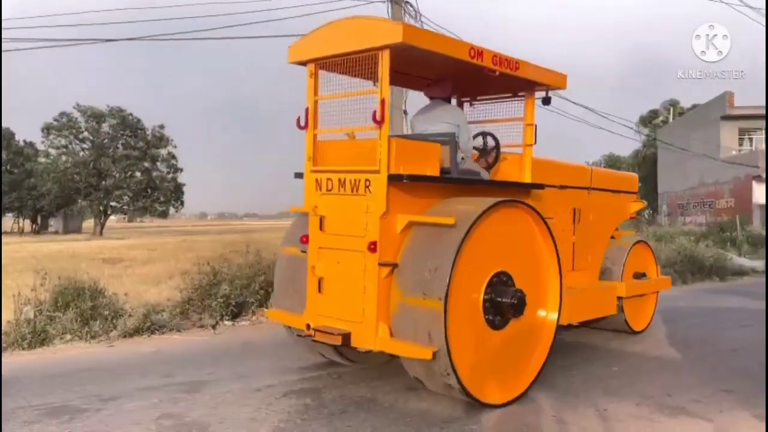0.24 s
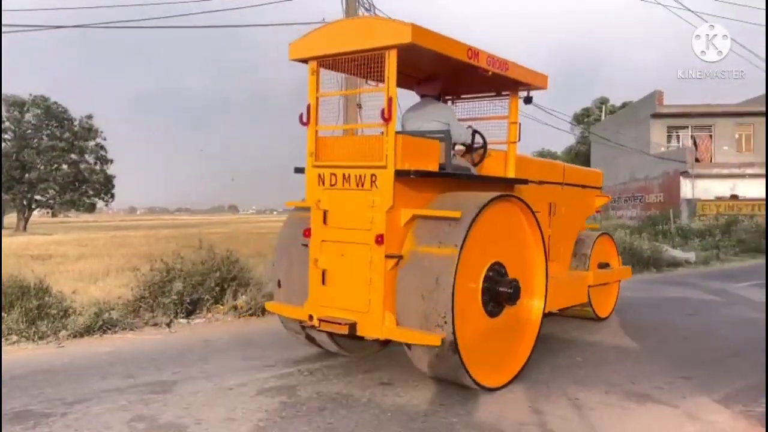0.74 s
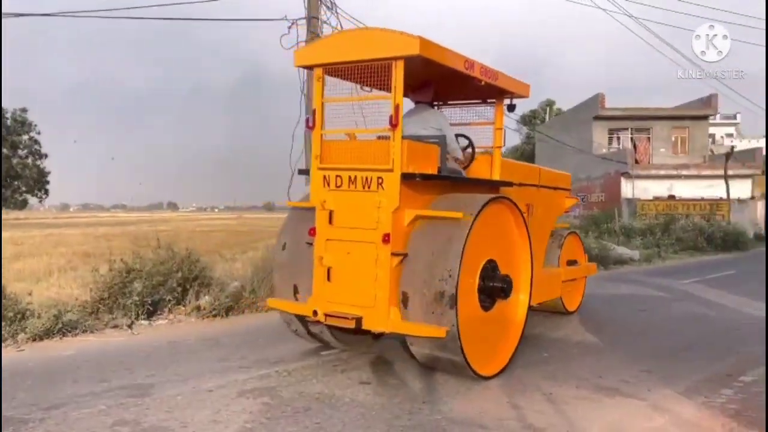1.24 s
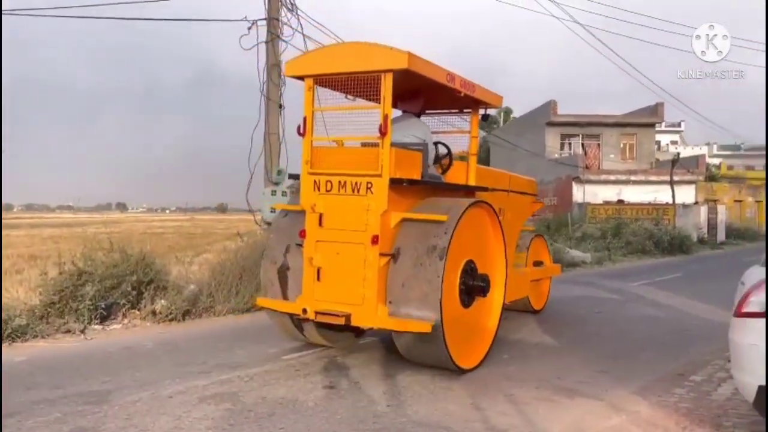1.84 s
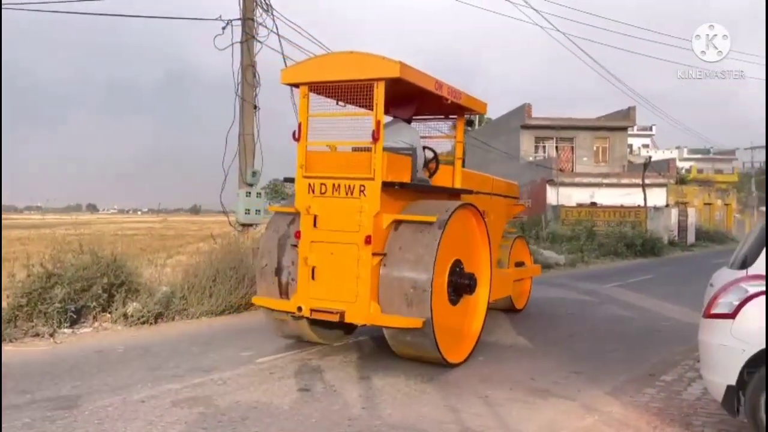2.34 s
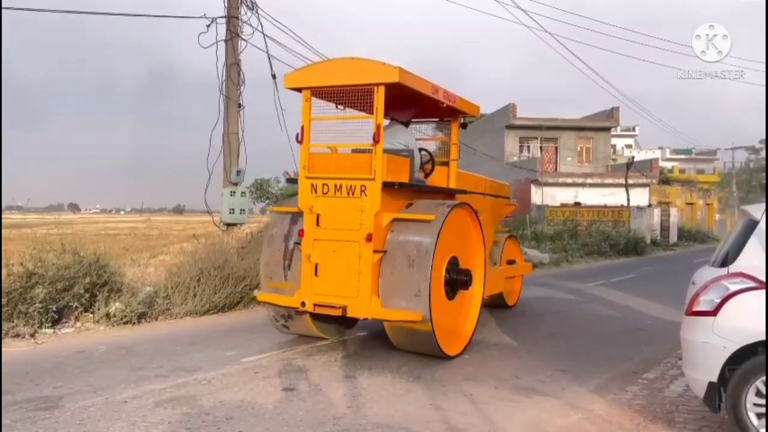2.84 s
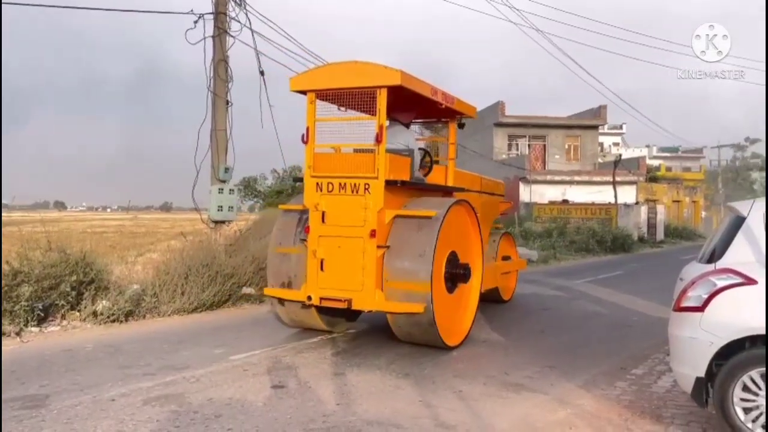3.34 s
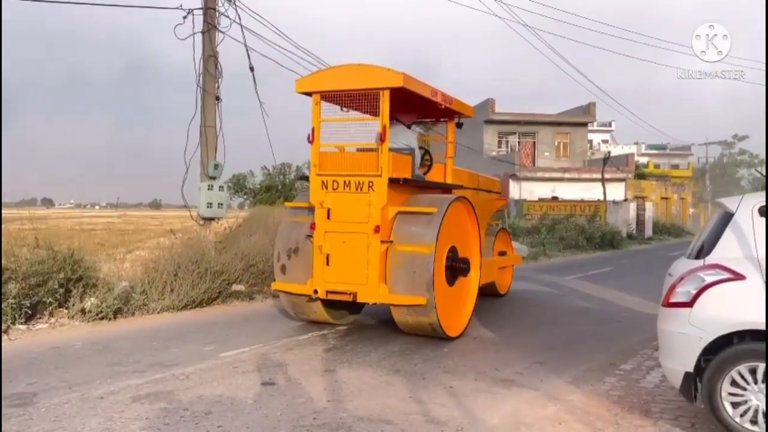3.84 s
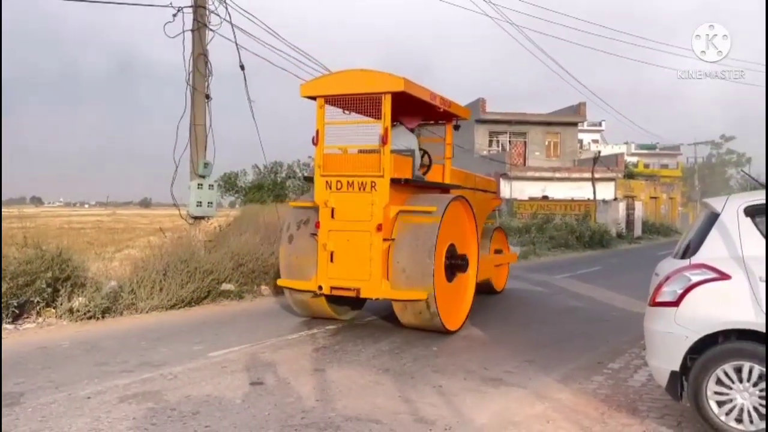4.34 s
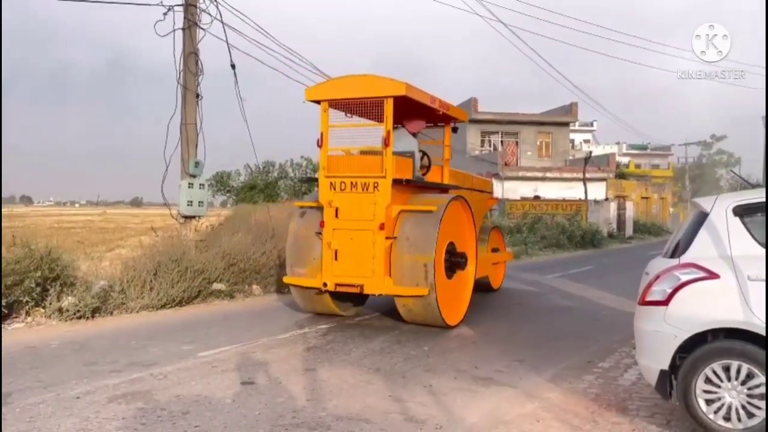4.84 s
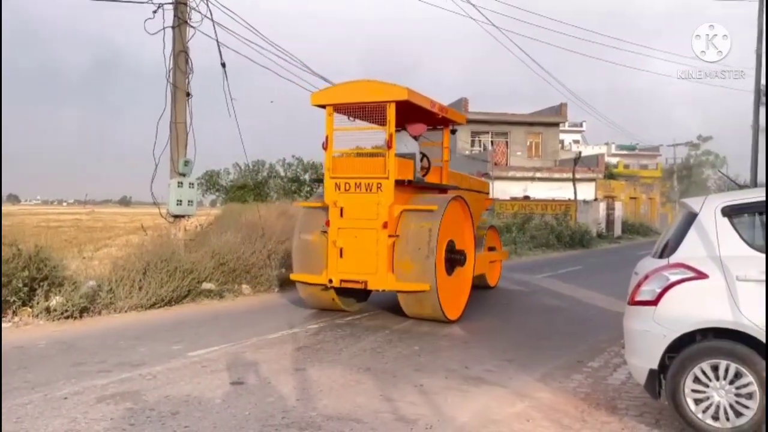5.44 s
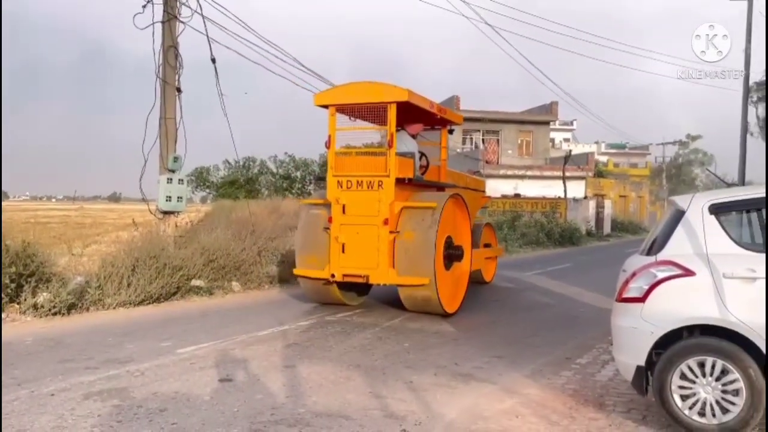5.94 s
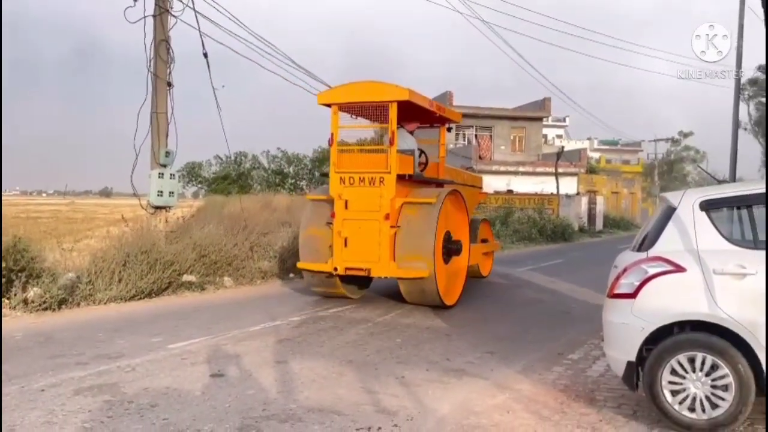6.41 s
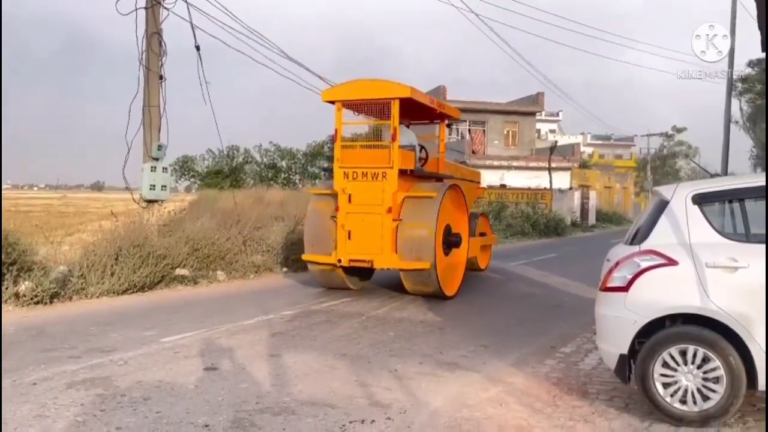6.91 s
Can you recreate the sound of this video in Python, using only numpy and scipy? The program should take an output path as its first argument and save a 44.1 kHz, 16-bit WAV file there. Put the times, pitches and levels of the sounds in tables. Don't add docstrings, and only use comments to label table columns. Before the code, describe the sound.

From 0 s a heavy six-cylinder diesel road roller is already running nearby at a constant idle, about fifty uneven firings a second grouped in a throb roughly eight times a second. Hard casing knocks ring around 1 kHz, over a low exhaust hum, a broad roar of fan, gears and drums, and a thin flickering valve hiss. It fades gently by about 5 dB through 7 s, sounding somewhat duller as it turns its back. Wind rumbles on the open stereo microphone throughout. A low thud hits at 0.4 s, softer ones near 1.2 and 2.3; puffs burst around 2.5, and a strong cluster of thumps comes at 3.4 to 4.0, with more puffs at 4.4. Wind is calmer around 5 s, then dense crackling flutters run 5.8 to 6.4. After 6.6 the breeze drops, leaving the receding engine. Open air, slightly thin camera treble.

```python
import sys
import numpy as np
from scipy import signal
from scipy.fft import rfft, irfft, next_fast_len
from scipy.io import wavfile
from scipy.ndimage import uniform_filter1d

SR = 44100
rng = np.random.default_rng(int(sys.argv[2]) if len(sys.argv) > 2 else 0)


def elevation(decibels):
    levels = np.asarray(decibels, float)
    return 10 ** (levels / 20)


def bounce(signal):
    frames = np.transpose(np.atleast_2d(signal))
    limited = np.clip(frames, -1, 1)
    pcm = np.round(limited * 32767).astype(np.int16)
    wavfile.write(sys.argv[1], SR, pcm)


N = 316197

# time_s, level_db
DISTANCE = [(0, -35), (.35, -34.5), (.7, -36), (1.5, -36.5), (2.5, -37.5), (3.5, -37), (4.5, -38),
            (5.5, -38.5), (6.4, -39.5), (7.17, -40)]
# time_s, tilt_db
TURNING = [(0, -7), (1.5, 2), (3, 1), (5, 8), (7.17, -1)]
# pitch_hz, width_hz, level_db, blow_db from each of six cylinders in turn
CASING_MODES = [
    (1010, 34, 0.5, (0, -4, -13, -4, -12, -10)),
    (960, 30, -1.5, (-1, 0, -12, -8, -12, -8)),
    (1044, 24, -1.5, (-1, -5, -9, -2, -10, -4)),
    (830, 50, -4, (-11, -8, 0, -13, -9, -6)),
    (1502, 28, -8.5, (-5, -5, -2, 0, -5, -4)),
    (2600, 180, -9.5, (0, -4, -3, -1, -4, -3)),
    (3400, 160, -17, (-3, 0, -4, -3, -1, -4)),
]
# multiple of the firing rate, level_db
EXHAUST_HARMONICS = [(1, 2.5), (3, 4.5), (5, 0.5), (7, -3), (8, -5)]
# pitch_hz, level_db per hertz
ROAR_COLOUR = [(30, -23), (60, -23), (150, -3.5), (500, -10), (1040, -4), (1100, -10), (1600, -9.5),
               (1800, -15.5), (2600, -16.5), (4400, -19.5), (4800, -22), (6500, -22.5), (7000, -25),
               (7600, -44)]
# pitch_hz, level_db
HISS_COLOUR = [(6600, -43), (7200, 7.5), (8100, -3), (8800, -1), (9200, 2.5), (10500, -2), (11600, -4),
               (11900, -30)]
# pitch_hz, likeness from -1 to 1 (below zero they swing against each other)
PORT_LIKENESS = [(550, .7), (1000, .9), (1900, .15), (2600, .6), (3200, .75), (3700, .9), (4300, .9),
                 (5100, .5), (6000, .88), (6650, 0.3), (7600, -.97), (8950, -.96), (9900, 0.2),
                 (10500, .975)]
# pitch_hz, lead_rad
PORT_LEAD = [(60, -0.5), (1500, 0.57), (2000, 0.3), (2800, 1.26), (3300, 0.5), (4500, 1.06), (5300, 0.95),
             (5800, 1), (12000, 0.5)]
# pitch_hz, lean_db
PORT_LEAN = [(60, -4), (500, 1.5), (1000, 1.5), (2200, 3.5), (3300, 3), (4200, 1.4), (5200, 7), (6000, 2),
             (7000, 5.5), (7600, -2.5)]
# time_s, strength_db, fineness_db (small eddies gain what large ones lose)
BREEZE = [(0, -23, 2.5), (1, -24.5, -1.5), (1.4, -22, 1.5), (2, -23, 3), (2.8, -24.5, -1.5), (3, -20, -0.5),
          (3.5, -23, -0.5), (4.1, -23, -0.5), (4.4, -26.5, 7), (4.6, -27.5, 4.5), (4.9, -28.5, 4),
          (5.4, -26.5, 6), (5.75, -23.5, 2), (5.9, -23, 6), (6.15, -25, 7.5), (6.45, -28, 0.5),
          (6.6, -41, -10.5), (7.17, -39, -5.5)]
# middle_s, length_s, top_db
SWELLS = [(0.0, 0.32, -13.5), (0.246, 0.32, -14.5), (0.386, .11, -15), (0.542, .16, -16),
          (0.692, 0.23, -15.5), (0.936, 0.27, -15.5), (1.187, 0.18, -11.5), (1.504, 0.63, -20),
          (1.67, 0.24, -17), (1.8, 0.091, -16), (1.89, 0.07, -18), (2.13, 0.25, -17.5), (2.284, 0.044, -11),
          (2.378, 0.1, -13), (2.667, 0.27, -15), (2.82, 0.12, -22), (3.15, 0.72, -26), (3.45, .22, -13),
          (3.697, 0.085, -10.5), (3.803, 0.095, -12), (3.897, 0.078, -7.5), (4.033, 0.07, -9),
          (4.234, 0.1, -14), (4.435, 0.11, -18), (5.7, 0.054, -21), (5.797, 0.031, -13),
          (6.022, 0.22, -19.5), (6.238, 0.1, -11), (6.37, 0.15, -13.5), (6.566, 0.087, -21)]
# middle_s, length_s, top_db, fineness_db
GUSTS = [(0.105, 0.13, -20.5, -3), (0.337, .11, -26, 5), (0.397, 0.1, -18, -14), (0.478, 0.12, -21, -7),
         (.7, 0.074, -33, -12), (0.886, 0.28, -28, 5.5), (1.112, 0.37, -16.5, -14),
         (1.185, 0.085, -15, -23), (1.613, 0.17, -20, -17), (1.75, 0.18, -18.5, -13),
         (1.967, 0.1, -19.5, -4.5), (2.007, 0.035, -21, -3), (2.064, 0.05, -14.5, -25),
         (2.16, .11, -23, -5), (2.262, 0.093, -15, -14), (2.42, 0.13, -19, -12), (2.54, 0.42, -19, -18),
         (3.365, 0.18, -25, -5), (3.79, 0.12, -18, -16), (3.862, 0.042, -21.5, 6.5), (3.9, 0.1, -17.5, -17),
         (4.023, 0.072, -19.5, -2), (4.323, 0.12, -18.5, -23), (4.42, .08, -18, -4), (5.22, 0.3, -37, 6),
         (5.993, 0.13, -15.5, 0), (6.085, 0.084, -33, 16.5), (6.234, 0.094, -13.5, -1.5),
         (6.294, 0.044, -18.5, 10), (6.373, 0.068, -25.5, 14.5)]
# pitch_hz, level_db
RUMBLE_COLOUR = [(20, -24), (35, -14), (55, 0.5), (95, -4), (130, -9.5), (250, -28.5)]
# pitch_hz, level_db
BUFFET_COLOUR = [(70, -36), (115, -2.5), (200, -2), (290, -7), (400, -21.5), (700, -58)]
# pitch_hz, level_db
FLUTTER_COLOUR = [(200, -12), (310, -3), (480, -4), (650, -9), (900, -19), (1300, -46)]
# pitch_hz, level_db
SPIT_COLOUR = [(350, -26.5), (550, -12), (800, -11), (1100, 4), (1600, -27)]
# pitch_hz, likeness from 0 to 1
WIND_LIKENESS = [(30, 0.47), (80, 0.96), (200, 0.78), (800, 0.92)]
# start_s, peak_db, pitch_hz, length_s
THUDS = [
    (0.384, -2.5, 100.5, 0.056),
    (1.179, -8, 56, 0.027),
    (2.269, -3, 106, 0.028),
    (3.386, -3, 80.5, 0.024),
    (3.861, 0.5, 73, 0.032),
    (3.992, -2, 140, 0.029),
    (4.029, -13, 169, 0.029),
    (5.989, -3, 83.4, 0.034),
    (6.224, -5, 74, 0.03),
]
# start_s, peak_db, pitch_hz, crackle_db
PUFFS = [(1.08, -7, 238, -22), (1.771, -9, 272, -21), (2.245, -18, 202, -20), (2.497, 0.5, 233, -17),
         (2.512, -4, 304, -16), (2.549, -2, 238, -35), (3.104, -9, 197, -25), (3.201, -7, 200, -16),
         (3.381, -7, 249, -16), (3.856, 0, 200, -14.5), (3.901, -7, 198, -25), (4.003, -3, 219, -18),
         (4.404, -1, 319, -36), (4.416, -6, 290, -34), (5.797, -1, 257, -24), (5.832, -6, 259, -8),
         (5.857, 1.5, 349, -11), (5.903, 2, 255, -9), (5.938, -2.5, 299, -23), (5.962, -8, 250, -9.5),
         (5.997, -4, 272, -36), (6.073, -3, 421, -30), (6.113, -3, 303, -9), (6.2, -14, 353, -17),
         (6.217, -7, 200, -9), (6.243, -3, 254, -2.5), (6.285, -7, 334, -12), (6.308, 0, 260, -29),
         (6.351, -15, 372, -27), (6.369, -3, 331, -24)]


def evened(x):
    return x / np.sqrt(np.mean(x ** 2) + 1e-20)


def read(points, hz):
    f, value = np.transpose(points)
    return np.interp(np.log(hz + 1), np.log(f + 1), value, left=value[0], right=value[-1])


def curve(rows, column):
    rows = np.array(rows)
    return np.interp(np.arange(N) / SR, rows[:, 0], rows[:, column])


def add(mix, start_s, sound):
    part = mix[:, round(start_s * SR):][:, :sound.shape[1]]
    part += sound[:, :part.shape[1]]


def drift(seconds):
    size = int(seconds * SR)
    return evened(uniform_filter1d(uniform_filter1d(rng.standard_normal(N), size), size))


def noise(colour, likeness, patchy_db, size=2048):
    frames = 4 * N // size + 5
    hz = np.fft.rfftfreq(size, 1 / SR)
    a, b, c, d, patches = rng.standard_normal((frames, len(hz), 5)).T
    patches = evened(uniform_filter1d(uniform_filter1d(patches, 12, 0), 6, 1))
    same = np.clip(read(likeness, hz), -1, 1)[:, None]
    left = a + 1j * b
    right = same * left + np.sqrt(1 - same ** 2) * (c + 1j * d)
    level = elevation(read(colour, hz)[:, None] + patchy_db * patches)
    in_range = (hz < 1.05 * colour[-1][0])[:, None]
    z = np.array([left, right]) * level * in_range
    return evened(signal.istft(z, nperseg=size, noverlap=3 * size // 4)[1][:, :N])


def ports(x):
    size = next_fast_len(N + 4096)
    hz = np.fft.rfftfreq(size, 1 / SR)
    half = elevation(read(PORT_LEAN, hz) / 2) * np.exp(.5j * read(PORT_LEAD, hz))
    return irfft(rfft(x, size) * [half, 1 / half], size)[:, :N]


def crank():
    cycle_hz, first_s = 8.385, .105
    return (np.arange(N) / SR - first_s) * cycle_hz + .012 * drift(.4)


def knocks(cycles):
    firing = np.floor(6 * cycles).astype(int)
    rattle = np.exp(-(6 * cycles % 1) / 0.24)
    start = np.diff(firing, prepend=firing[0]) > 0
    uneven_db = 1.6 * rng.standard_normal((400, len(CASING_MODES)))
    out = np.zeros((2, N))
    for k, (hz, width_hz, db, blows_db) in enumerate(CASING_MODES):
        blow = elevation(np.array(blows_db)[firing % 6] + uneven_db[firing % 400, k])
        drive = blow * (5.2 * start + 0.4 * rattle * rng.standard_normal((2, N)))
        pole = np.exp((2j * hz - width_hz) * np.pi / SR)
        ring = signal.lfilter([1], [1, -pole], drive)
        ring = signal.lfilter([1], [1, -pole], ring).imag
        tilt_db = curve(TURNING, 1) * (hz < 900)
        out += elevation(db + tilt_db) * evened(ring)
    return out


def exhaust(cycles):
    firing = 2 * np.pi * 6 * cycles
    out = np.zeros(N)
    for multiple, db in EXHAUST_HARMONICS:
        phase = 2 * np.pi * rng.random()
        out += elevation(db + 1.0 * drift(0.26)) * np.sin(multiple * firing + phase)
    return out


def machine_roar(throb):
    level_db = 11.5 + 1.1 * throb + 0.39 * drift(0.015)
    return elevation(level_db) * noise(ROAR_COLOUR, PORT_LIKENESS, patchy_db=1.5)


def valve_hiss(throb):
    level_db = -7 + 2.2 * throb + .9 * drift(0.022)
    return elevation(level_db) * noise(HISS_COLOUR, PORT_LIKENESS, patchy_db=0.0)


def roller():
    cycles = crank()
    throb = np.exp(13.0 * (np.cos(2 * np.pi * (cycles - .55)) - 1))
    engine = machine_roar(throb) + valve_hiss(throb) + knocks(cycles) + elevation(1.5) * exhaust(cycles)
    return elevation(curve(DISTANCE, 1)) * ports(engine)


def swelling(base_db, rows):
    t = np.arange(0, N, 64) / SR
    middle_s, length_s, top_db = np.transpose(rows)[:, :, None]
    shape = np.cos(np.pi * np.clip((t - middle_s) / length_s, -.5, .5)) ** 2
    swells = (elevation(2 * top_db) * shape).sum(0)
    return 10 * np.log10(elevation(2 * base_db) + np.interp(np.arange(N) / SR, t, swells))


def wind():
    lumps = np.tanh(drift(0.0044))
    breeze_db, fine_db = curve(BREEZE, 1), curve(BREEZE, 2)
    middle_gusts = [row[:3] for row in GUSTS]
    small_gusts = [(s, length, db + fine) for s, length, db, fine in GUSTS]
    rumble_db = swelling(breeze_db + 3 - fine_db, SWELLS)
    buffet_db = swelling(breeze_db, middle_gusts)
    flutter_db = swelling(breeze_db - 4.5 + fine_db, small_gusts)
    rumble = elevation(rumble_db + 1.5 * lumps) * noise(RUMBLE_COLOUR, WIND_LIKENESS, patchy_db=1.5, size=4096)
    buffet = elevation(buffet_db + 1.85 * lumps) * noise(BUFFET_COLOUR, WIND_LIKENESS, patchy_db=2.5, size=4096)
    flutter = elevation(flutter_db - 3 + 2.2 * lumps) * noise(FLUTTER_COLOUR, WIND_LIKENESS, patchy_db=1.5, size=4096)
    spit_db = 2 * flutter_db - 11.5 + 4. * lumps
    spit = elevation(spit_db) * noise(SPIT_COLOUR, WIND_LIKENESS, patchy_db=3.5, size=4096)
    return rumble + buffet + flutter + spit


def thuds():
    out = np.zeros((2, N))
    for (start_s, db, hz, length_s), apart in zip(THUDS, rng.standard_normal((len(THUDS), 2, 1))):
        t = np.arange(0, 4 * length_s, 1 / SR)
        turns = hz * t + 0.77 * (1 - np.exp(-t / 0.0058)) + 0.071 * apart
        envelope = (1 - np.exp(-t / 0.0017)) ** 2 * np.exp(-t / length_s)
        add(out, start_s, elevation(db - 3.0) * np.sin(2 * np.pi * turns) * envelope)
    return out


def puffs():
    length_s, rise_s = .013, .0021
    t = np.arange(0, 4 * length_s, 1 / SR)
    fade = np.exp(-t / length_s)
    envelope = (1 - np.exp(-t / rise_s)) ** 2 * fade
    out = np.zeros((2, N))
    for (start_s, db, hz, crackle_db), chance in zip(PUFFS, rng.standard_normal((len(PUFFS), 3, 64))):
        crackle_hz = 530 * (1 + .08 * chance[0, -1])
        wobble = np.array([np.interp(t * 400, np.arange(64), c) for c in chance])
        turns = hz * t + 0.47 * (1 - np.exp(-t / 0.0027)) + 0.22 * wobble[0] + 0.12 * wobble[1:]
        crackle_turns = crackle_hz * t + .2 * (wobble[0] + 0.63 * wobble[1:])
        swing = elevation(db - 3.0) * np.sin(2 * np.pi * turns)
        crackle = elevation(crackle_db + 8) * np.sin(2 * np.pi * crackle_turns) * fade
        add(out, start_s, (swing + crackle) * envelope)
    return out


def scene():
    return roller() + wind() + thuds() + puffs()


def thinned_treble(x):
    from_hz, band_hz, top_hz = 2700, 689, 11800
    lead_in = 541
    frame = dict(window="cosine", nperseg=2048, noverlap=1024)
    pair = np.pad([x[0] + x[1], x[0] - x[1]], [(0, 0), (lead_in, 0)])
    hz, t, z = signal.stft(pair, SR, **frame)
    band = (hz / band_hz).astype(int)
    edges = np.flatnonzero(np.diff(band, prepend=-1))
    line_power = abs(z) ** 2
    power = (np.add.reduceat(line_power, edges, axis=1) / np.bincount(band)[:, None])[:, band]
    other = power[::-1]
    waver = evened(uniform_filter1d(rng.standard_normal((2, len(edges), len(t))), size=3))[:, band]
    weak = power < other * elevation(-2 * (3.4 + 3.6 * np.tanh(waver)))
    faint = line_power < power.max(0) * elevation(2 * -8 + 2 * 6.3 * (power < other))
    in_treble = (hz > from_hz)[:, None]
    above_top = hz[:, None] > top_hz + 60 * waver
    drop = (weak | faint) & in_treble | above_top
    both, apart = signal.istft(z * ~drop, SR, **frame)[1][:, lead_in:N + lead_in]
    return np.array([both + apart, both - apart]) / 2


def roll_off(x):
    return signal.sosfilt(signal.butter(12, 12570, fs=SR, output="sos"), x)


def record(dry):
    cut = signal.sosfilt(signal.butter(2, 30, "high", fs=SR, output="sos"), dry)
    limited = 1.02 * np.tanh(cut / 1.243)
    return roll_off(thinned_treble(limited))


dry = scene()
out = record(dry)
bounce(out)
```